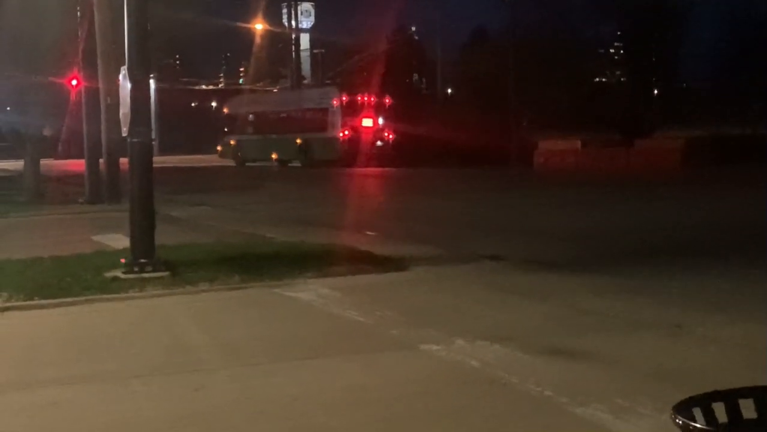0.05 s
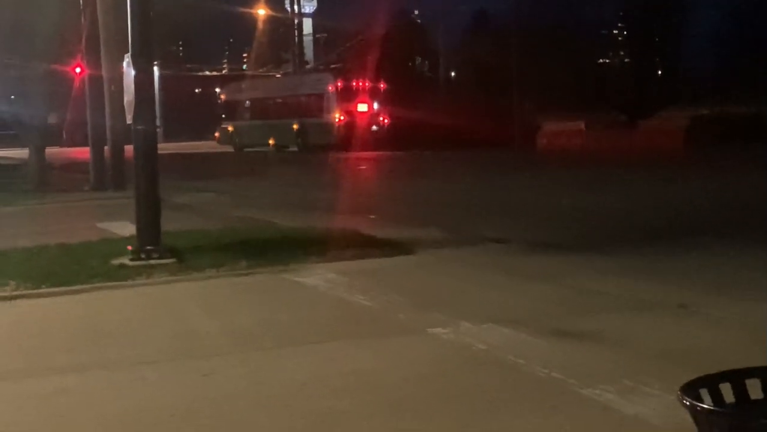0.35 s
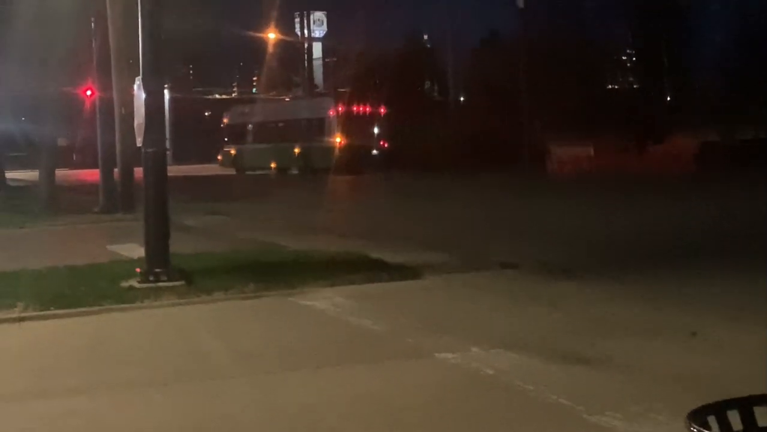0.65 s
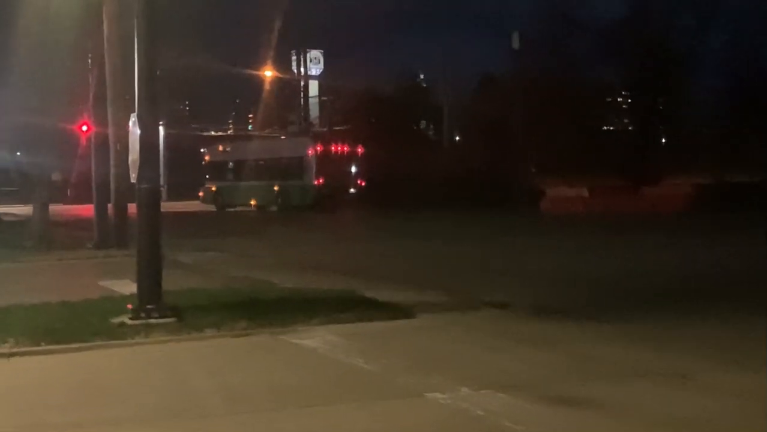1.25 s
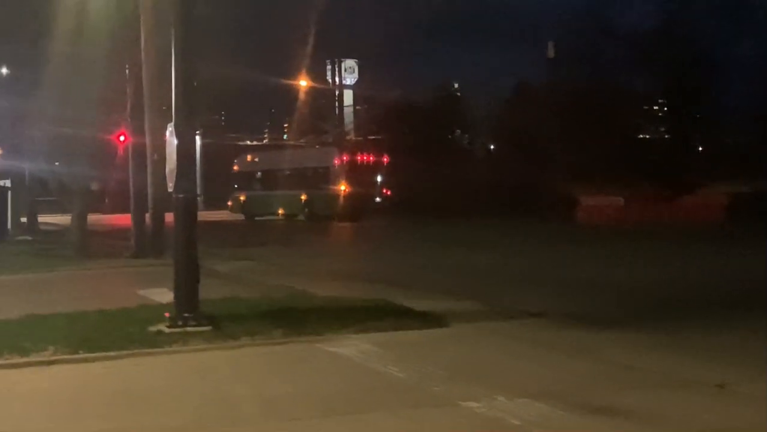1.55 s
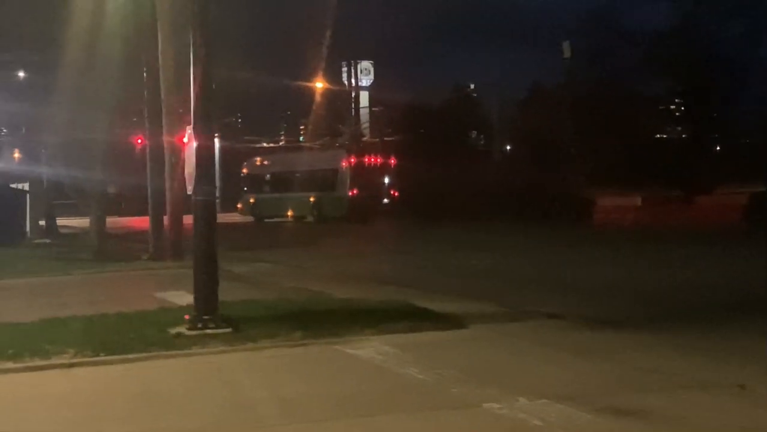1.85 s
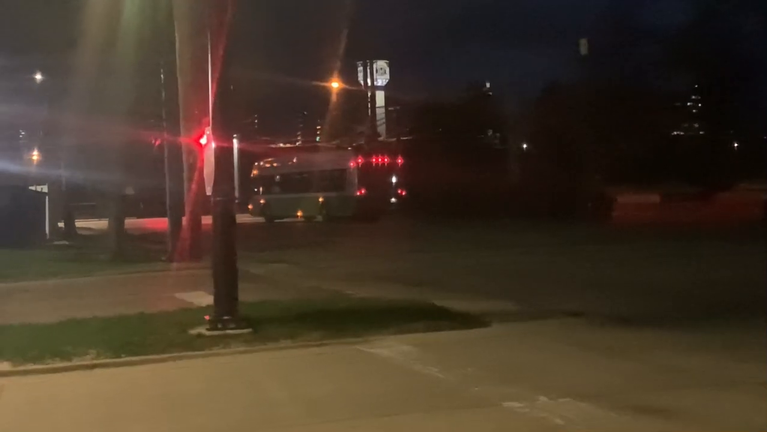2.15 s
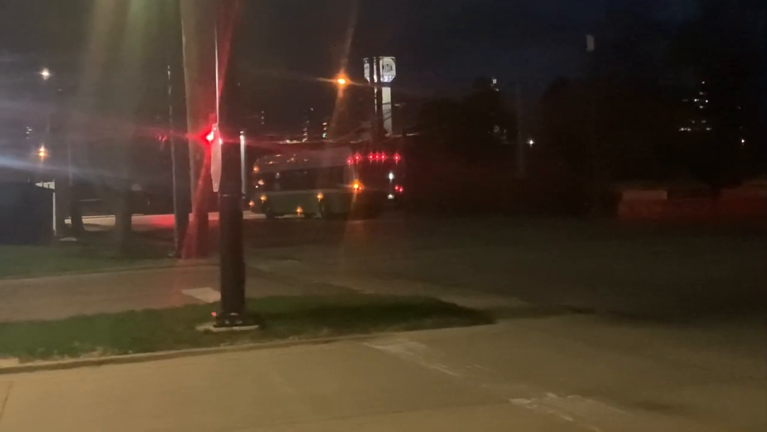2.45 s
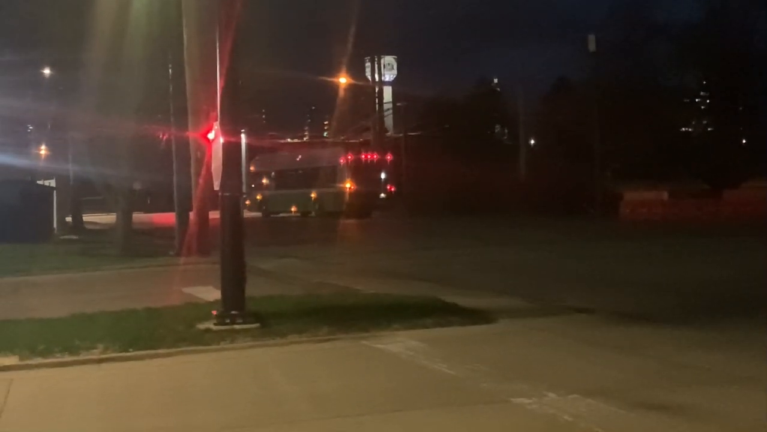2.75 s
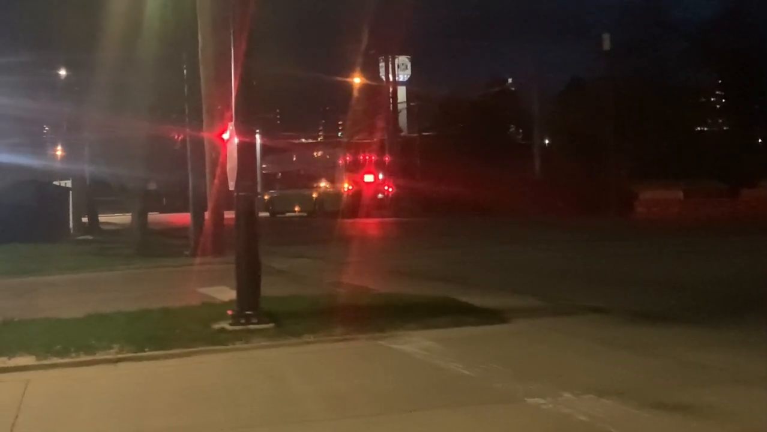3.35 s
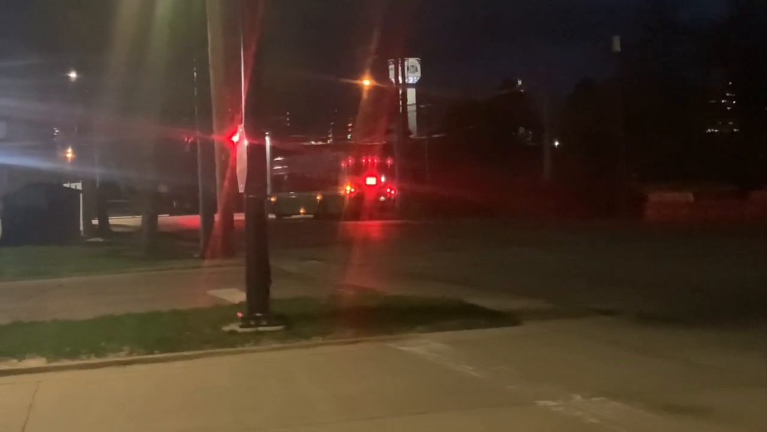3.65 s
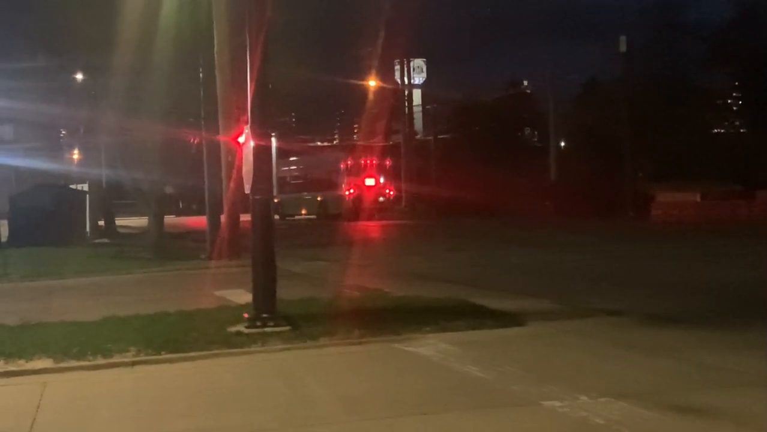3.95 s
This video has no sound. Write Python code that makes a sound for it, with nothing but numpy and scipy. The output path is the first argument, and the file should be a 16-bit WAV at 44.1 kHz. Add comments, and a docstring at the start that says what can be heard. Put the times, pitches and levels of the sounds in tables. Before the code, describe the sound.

A trolleybus pulls away with a deep hum, hissing overhead wires and one sharp clack.

```python
"""Trolleybus pulling away at night

On an empty street a deep motor hum swells, sinks and swells again over a low rumble and tyre noise.
The shoes, the sliding contacts on top of the bus's poles, hiss along the overhead wires.
They rattle over small joints and clack once through a metal fitting, and the wires groan briefly."""
import sys
import numpy as np
from scipy import signal
from scipy.fft import rfft, irfft
from scipy.io import wavfile
from scipy.ndimage import map_coordinates

SR = 44100
rng = np.random.default_rng(int(sys.argv[2]) if len(sys.argv) > 2 else 0)


def dump_mix(stems):
    """Bounce the given channels to the path in sys.argv[1] as a 16-bit WAV at rate SR."""
    frames = np.atleast_2d(stems).T  # one column per channel
    limited = np.clip(frames, -1, 1)  # hard clip at full scale
    pcm = np.round(limited * 32767).astype(np.int16)
    wavfile.write(sys.argv[1], SR, pcm)


N = 176400  # 4 seconds
TIME = np.arange(N) / SR


def undb(db):
    """Turn decibels into a number to multiply by."""
    return 10 ** (np.asarray(db) / 20)


def unit(x):
    """Scale a signal to an average power of 1."""
    return x / np.sqrt(np.mean(x ** 2) + 1e-20)


def curve(rows, column=1):
    """Join one column of a table with straight lines in time."""
    rows = np.array(rows, float)
    return np.interp(TIME, rows[:, 0], rows[:, column])


def wobble(rate_hz):
    """A smooth random wobble of typical size 1; a higher rate moves faster."""
    hz = np.fft.rfftfreq(N, 1 / SR)
    return unit(irfft(rfft(rng.standard_normal(N)) / (1 + (hz / rate_hz) ** 4), N))


def turn(hz):
    """Add up a moving pitch into the angle of a sine wave."""
    return 2 * np.pi * np.cumsum(hz) / SR


def fade(age, fade_s):
    """Die away by 60 dB every fade_s seconds."""
    return np.exp(-np.log(1000) * age / fade_s)


def place(x, start):
    """Put a sound at its start time in seconds."""
    return np.concatenate([np.zeros(int(start * SR)), x, np.zeros(N)])[:N]


def noise():
    """Left and right noise, alike in the bass and mostly alike above 208 Hz."""
    apart = signal.lfilter(*signal.butter(2, 208, "high", fs=SR), rng.standard_normal((2, N)))
    return rng.standard_normal(N) + undb(-6) * apart


def noise_band(hz, width_hz):
    """Noise around one pitch, passed twice through a filter of the given width."""
    peak = signal.iirpeak(hz, hz / width_hz, fs=SR)
    return unit(signal.lfilter(*peak, signal.lfilter(*peak, noise())))


def colour(x, rows):
    """Change the balance of low and high; white noise keeps its overall power."""
    row_hz, row_db = np.array(rows, float).T
    hz = np.fft.rfftfreq(N, 1 / SR)
    gain = unit(undb(np.interp(np.log(hz + 1), np.log(row_hz), row_db)))
    # arrange the filter so that it rings after a hit, never before
    cepstrum = irfft(np.log(gain), N)
    cepstrum[1:N // 2] *= 2
    cepstrum[N // 2 + 1:] = 0
    return irfft(rfft(x) * np.exp(rfft(cepstrum)), N)


def flicker(x, depth_db=4.6, hold_s=.09, width_hz=60, size=1024):
    """Let narrow bands of pitch swell and fade, each on its own."""
    hz, t, bands = signal.stft(x, SR, nperseg=size)
    chance = rng.standard_normal((512, 128))
    grid = np.meshgrid(hz / width_hz, t / hold_s, indexing="ij")
    db = depth_db * map_coordinates(chance, grid, order=1, mode="wrap")
    return signal.istft(bands * unit(undb(db)), SR)[1][:, :N]


# The motor's hum. Each row: time in seconds, pitch in Hz, level in dB.
HUM = [(0, 60.3, -58), (.21, 59.3, -57), (.27, 56.1, -33), (.36, 52.34, -34.5), (.51, 52.7, -32.5),
       (.6, 51.45, -37.5), (.7, 49.9, -41.5), (.77, 50.7, -36.5), (1.3, 50.55, -38), (1.5, 51.27, -34.5),
       (1.57, 41.42, -43), (2.4, 40.9, -49), (3.49, 40.9, -50), (3.535, 54.38, -35.5), (3.7, 52.53, -32.5),
       (4, 52.15, -33.5)]
# The tones in the hum. Each row: multiple of the pitch, dB added to the hum's level.
HUM_TONES = [(1, 0.5), (2, -25), (3, -22.5), (4, -26), (5, -34.5), (6, -30)]
# The drive's whine. Each row: time in seconds, pitch in Hz, level in dB.
DRIVE_WHINE = [(.9, 224, -64.5), (1.25, 233, -54), (1.52, 246, -50), (1.85, 253, -63)]
def motor():
    """The motor hums deeply, a weak drone beats against the hum, and the drive whines upward."""
    phase = turn(curve(HUM) * (1 + 0.0089 * wobble(13.2)))
    hum = 0
    for multiple, db in HUM_TONES:
        waver_db = (1.4 if multiple == 1 else 3) * wobble(9.3)
        hum += undb(db + waver_db) * np.sin(multiple * phase + rng.uniform(0, 2 * np.pi))
    drone_hz, drone_db = 59.8, -52
    drone = undb(drone_db + 2 * wobble(9.7)) * np.sin(turn(drone_hz * (1 + 0.02134 * wobble(5.1))))
    whine = undb(curve(DRIVE_WHINE, column=2) + 1.2 * wobble(13)) * np.sin(turn(curve(DRIVE_WHINE)))
    return np.sqrt(2) * (hum * undb(curve(HUM, column=2)) + drone + whine)


# The tone of the bus's rumble. Each row: frequency in Hz, relative strength in dB.
RUMBLE_COLOUR = [(20, -37.5), (38, -14), (78, 1), (125, -2), (200, -8.5), (300, -13.5), (430, -25.5),
                 (900, -37), (2000, -61.5)]
# How loud the rumble is. Each row: time in seconds, level in dB.
RUMBLE_LEVEL = [(0, -49.5), (.3, -44.5), (1.25, -49), (1.42, -41), (1.62, -46), (2.1, -46.5), (3.4, -44),
                (4, -46)]
# The tone of the tyres and distant street. Each row: frequency in Hz, relative strength in dB.
TYRE_COLOUR = [(500, -2), (850, -0.5), (1250, -5.5), (1720, -8), (2400, -10), (3500, -12.5), (3900, -30),
               (5000, -35), (11000, -35), (15000, -45.5)]
# How loud the tyres and distant street are. Each row: time in seconds, level in dB.
TYRE_LEVEL = [(0, -60.5), (2.7, -60.5), (3.3, -59.5), (4, -60.5)]
# A whir that grows as the bus gains speed. Each row: time in seconds, level in dB.
WHIR_LEVEL = [(2.4, -94), (3.25, -63), (4, -66)]
def rolling():
    """The moving bus rumbles, its tyres make a grainy rush, and a whir comes in late."""
    rumble = flicker(colour(noise(), RUMBLE_COLOUR), depth_db=2.8, hold_s=.2, width_hz=18, size=4096)
    tyres = colour(noise(), TYRE_COLOUR) * undb(curve(TYRE_LEVEL))
    whir = noise_band(hz=1720, width_hz=540) * undb(curve(WHIR_LEVEL))
    return rumble * undb(curve(RUMBLE_LEVEL)) + flicker(tyres + whir)


def wire_shimmer(x):
    """The long wire adds a dense ringing to the sound that runs through it."""
    tail = rng.standard_normal(SR) * fade(TIME[:SR], fade_s=0.89)
    return x + undb(1) * signal.fftconvolve(x, tail[None] / np.linalg.norm(tail))[:, :N]


# The tone of the shoes' hiss. Each row: frequency in Hz, relative strength in dB.
HISS_COLOUR = [(500, -19), (1400, -25.5), (2300, -28), (2800, -8), (3100, -0.5), (3500, 6), (3750, -12.5),
               (4000, -18), (4700, -40.5), (6300, -22), (7600, -32), (15000, -48.5)]
# How loud the hiss is. Each row: time in seconds, level in dB.
HISS_LEVEL = [(0, -73), (.16, -73.5), (.26, -57.5), (1.55, -55), (2, -57.5), (2.2, -67), (2.45, -69),
              (2.65, -82), (4, -78.5)]
# How loud the wire sings. Each row: time in seconds, level in dB.
SING_LEVEL = [(0, -58.5), (.3, -74), (1, -66.5), (1.55, -61), (1.85, -63.5), (2.4, -72.5)]
def sliding_shoes():
    """The shoes rub the wire with a fluttering hiss and a thin whine; the wire sings a wavering note."""
    whine_hz, whine_db, sing_hz = 3478, -5.5, 1388
    whine = np.sin(turn(whine_hz + 28.5 * wobble(22))) * (1 + .5 * wobble(31))
    rubbing = wire_shimmer(colour(noise(), HISS_COLOUR))
    hiss = unit(flicker(rubbing)) + undb(whine_db) * whine
    sing = np.sin(turn(sing_hz + 11.825 * wobble(20))) * undb(curve(SING_LEVEL) + 3 * wobble(24))
    return hiss * undb(curve(HISS_LEVEL) + 1.57 * wobble(57)) + sing


def hits(rows, attack_s, fade_s, tail_db, tail_fade_s):
    """Each hit gives its own short crack and stirs the same duller ringing tail."""
    build_s, dull_hz = 0.0034, 4870
    crack_power, strikes = 0, np.zeros(N)
    for start, db in rows:
        age = np.maximum(TIME - start, 0)
        crack_power += (undb(db) * (1 - np.exp(-age / attack_s)) * fade(age, fade_s)) ** 2
        strikes[int(start * SR)] += undb(db + tail_db)
    tail = noise() * (1 - np.exp(-TIME / build_s)) * fade(TIME, tail_fade_s)
    tail = signal.lfilter(*signal.butter(1, dull_hz, fs=SR), tail)
    return np.sqrt(crack_power) * noise() + signal.fftconvolve(tail, strikes[None])[:, :N]


# The notes of the poles and fittings. Each row: pitch in Hz, relative level in dB, seconds to fade 60 dB.
METAL_NOTES = [(1540, -17, .4), (1630, -14, .25), (2080, -16, .28), (2235, -14, .3), (3042, -8, .18),
               (4117, -11, .3), (4222, -4, .14), (5880, -22, .2), (7105, -22, .27)]
def metal_ring(cutoff_hz=SR):
    """Loose metal rings with unsteady notes; a soft hit leaves out those above the cutoff."""
    ring = 0
    for hz, db, fade_s in METAL_NOTES:
        wander_hz = 26 * np.repeat(rng.standard_normal(100), SR // 100)
        strength = undb(db) / (1 + (hz / cutoff_hz) ** 8)
        ring += strength * fade(TIME[:SR], fade_s) * np.sin(turn(hz + wander_hz))
    return ring


# Small knocks at the wire's joints. Each row: start in seconds, level in dB.
KNOCKS = [(0.3, -57), (0.338, -56.5), (0.4234, -51.5), (0.459, -47.5), (0.979, -63.5), (1.2175, -58.5),
          (1.3218, -62.5), (1.3502, -52.5), (1.4176, -53.5), (1.484, -54.5), (1.8479, -54.5), (2.22, -61),
          (2.2355, -58), (2.2742, -54.5), (2.2924, -53.5), (2.325, -54), (2.3648, -53), (2.406, -58.5),
          (2.4781, -63)]
# The tone of the knocks. Each row: frequency in Hz, relative strength in dB.
KNOCK_COLOUR = [(200, -14), (600, 1.5), (1000, 0.5), (1500, -1.5), (2200, 7.5), (2650, -3), (3900, 1.5),
                (4600, -16), (5900, -8.5), (7200, -20), (8300, -50.5), (15000, -44)]
def rattle():
    """The shoes knock softly over joints: a bright scrape, ringing poles and the metal's lower notes."""
    pole = rng.standard_normal(N) * fade(TIME, fade_s=0.012)
    knocks = hits(KNOCKS, attack_s=0.00048, fade_s=0.24, tail_db=2.5, tail_fade_s=0.35)
    pole_knocks = signal.fftconvolve(knocks, pole[None] / np.linalg.norm(pole))[:, :N]
    metal, scrape_level = 0, 0
    for start, db in KNOCKS:
        metal += undb(db + 8.5) * place(metal_ring(cutoff_hz=2400), start)
        scrape_level += undb(db - 10.5) * place(fade(TIME, fade_s=0.095), start)
    clatter = flicker(colour(pole_knocks, KNOCK_COLOUR))
    return clatter + metal + scrape_level * noise_band(hz=5900, width_hz=2800)


# The loud clack and its bounce. Each row: start in seconds, level in dB.
CLACK_HITS = [(.4845, -43), (.4885, -32), (.506, -42.5)]
# The tone of the clack. Each row: frequency in Hz, relative strength in dB.
CLACK_COLOUR = [(200, -0.5), (450, -0.5), (1050, -1), (1600, -3), (2250, -1.5), (2650, -2), (3050, 3),
                (3600, -14), (4200, -16), (4800, -10.5), (7100, -7), (8300, -20.5), (15000, -23.5)]
def clack():
    """A shoe strikes a metal fitting: a crack and a rough clash that lingers in the wire."""
    ring_start_s, clash_db, linger_db = .4865, -29.5, -57
    age = TIME - ring_start_s
    clash = undb(clash_db) * place(metal_ring(), ring_start_s) * (1 + .6 * wobble(110))
    linger_level = undb(linger_db) * (age > 0) * fade(np.abs(age), fade_s=1.24)
    linger = linger_level * noise_band(hz=4110, width_hz=260)
    crack = hits(CLACK_HITS, attack_s=0.00039, fade_s=0.03, tail_db=-7, tail_fade_s=0.46)
    return clash + linger + flicker(colour(crack, CLACK_COLOUR))


# The wire's groans. Each row: start and length in seconds, first and last pitch in Hz, level in dB.
GROANS = [(0.52, 0.524, 577, 567.8, -60), (2.26, 0.156, 624, 689, -52), (3.618, 0.35, 641, 577, -61)]
def wire_groans():
    """Rubbing draws short, rough tones from the wire, each sliding a little in pitch."""
    roughness, octave_db = 0.49, -14
    groans = 0
    for start, length, from_hz, to_hz, db in GROANS:
        progress = np.clip((TIME - start) / length, 0, 1)
        hz = from_hz + (to_hz - from_hz) * progress
        phase = turn(hz * (1 + 0.0223 * wobble(76)))
        tone = np.sin(phase) + undb(octave_db) * np.sin(2 * phase)
        groans += undb(db) * np.sin(np.pi * progress) * tone
    return np.sqrt(2) * groans * (1 + roughness * wobble(70))


def scene():
    """All the sounds of the bus and its wires, added together."""
    return motor() + rolling() + sliding_shoes() + clack() + rattle() + wire_groans()


# The left channel's phase shift against the right. Each row: frequency in Hz, shift in radians.
STEREO_SHIFT = [(0, 0), (250, 0.56), (440, -1.74), (800, -3), (1400, -5), (2050, -4.5), (2430, -2.5),
                (3200, -4.5), (4200, -4.5), (5150, -2.5), (6400, -0.5), (7500, 3), (10400, 2)]
def record(dry):
    """Widen the stereo with a phase shift that changes with pitch, tip the bass right, cut the top."""
    left_bass_db, top_hz = -1.5, 15100
    size = 2 * N
    hz = np.fft.rfftfreq(size, 1 / SR)
    shift = np.interp(hz, *np.array(STEREO_SHIFT, float).T)
    bass_db = left_bass_db / (1 + (hz / 250) ** 4)
    left = np.exp(1j * shift / 2) * undb(bass_db / 2)  # half here, the opposite half on the right
    heard = irfft(rfft(dry, size) * np.array([left, 1 / left]), size)[:, :N]
    return signal.sosfilt(signal.ellip(8, .2, 70, top_hz, fs=SR, output="sos"), heard)


dry = scene()
out = record(dry)
dump_mix(out)
```